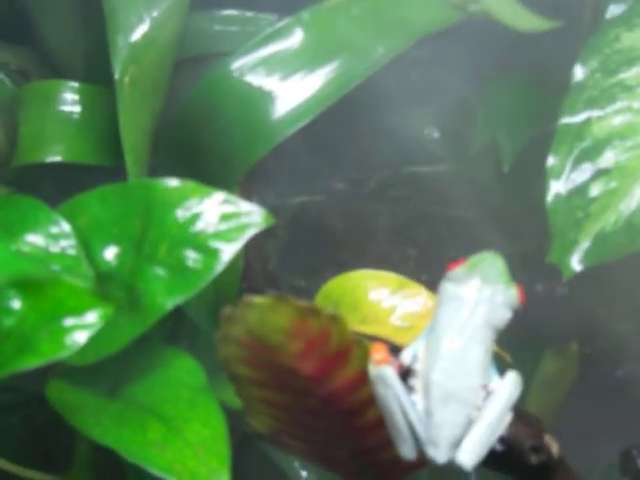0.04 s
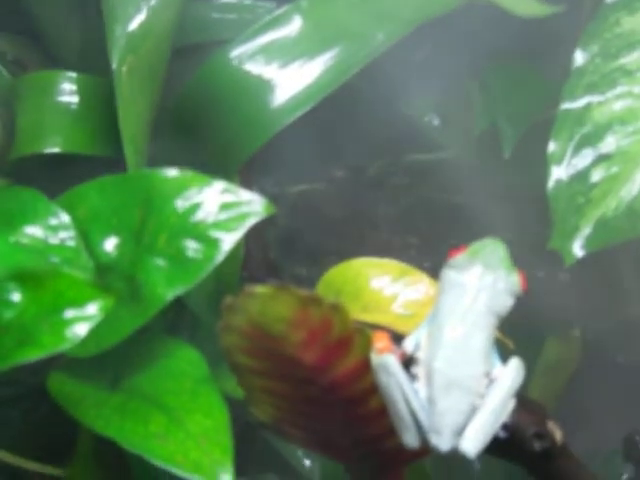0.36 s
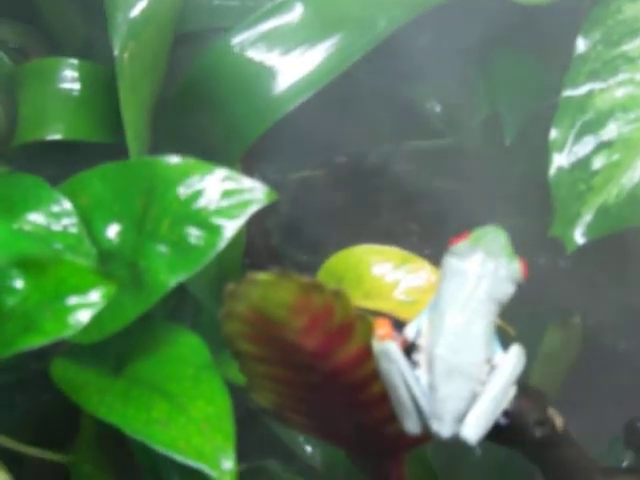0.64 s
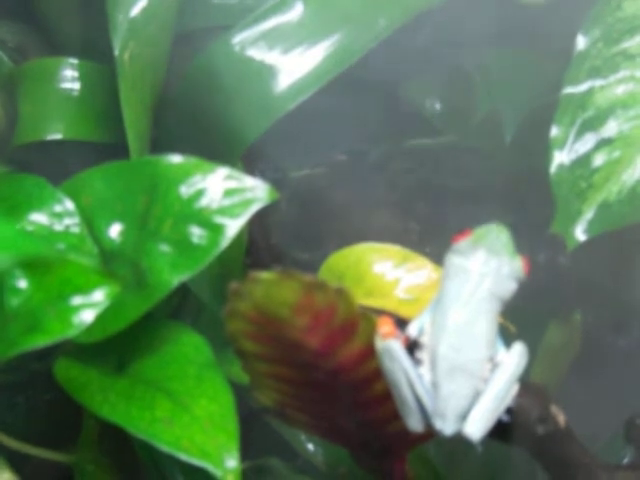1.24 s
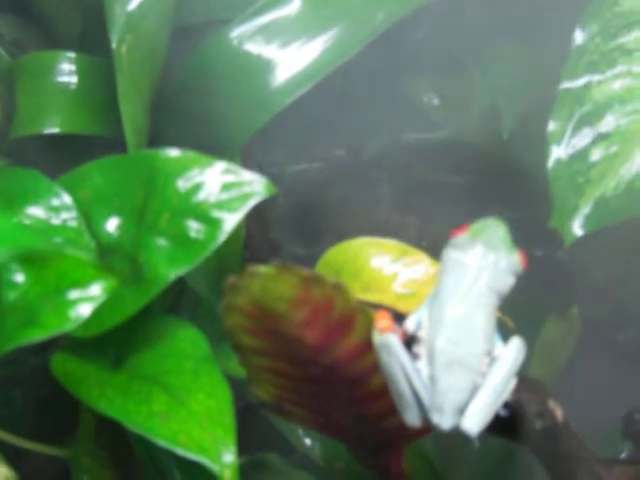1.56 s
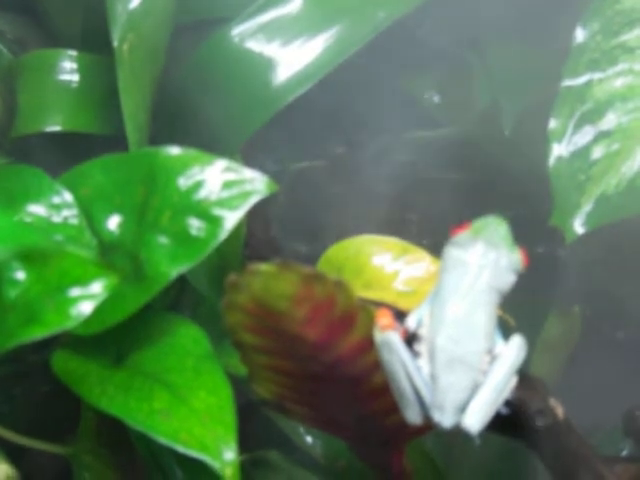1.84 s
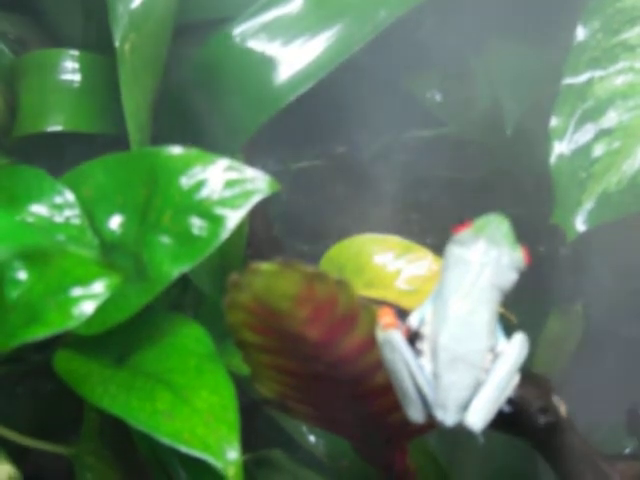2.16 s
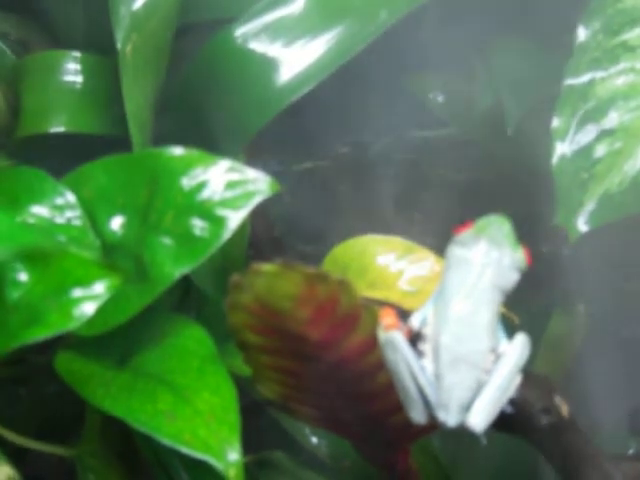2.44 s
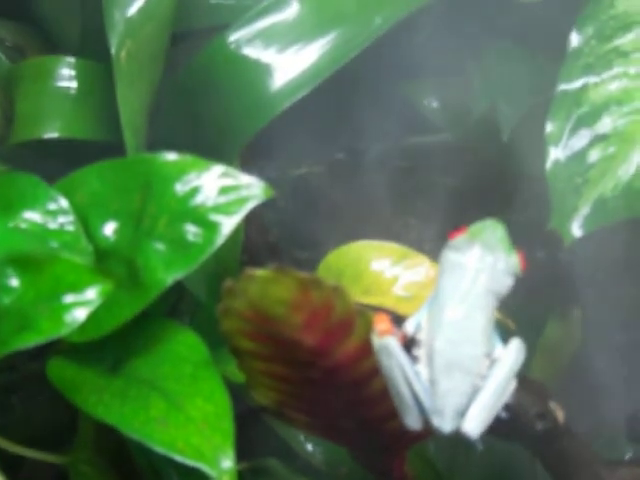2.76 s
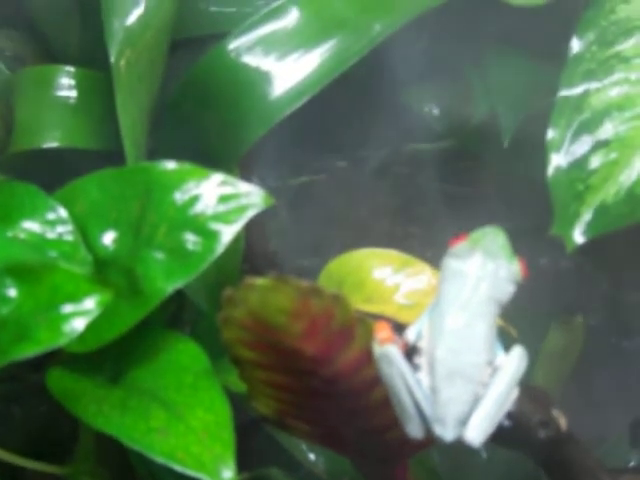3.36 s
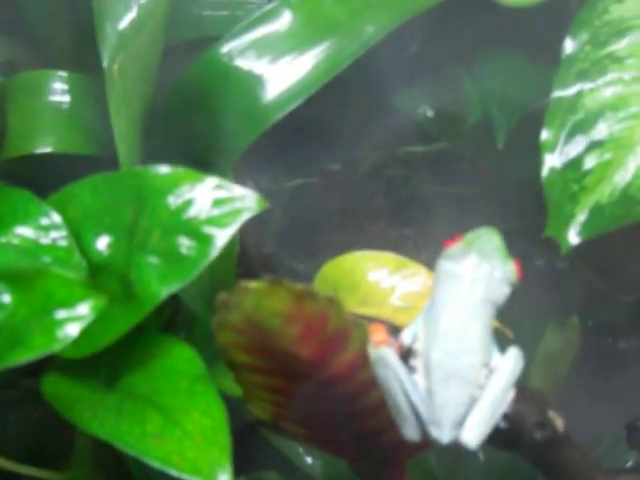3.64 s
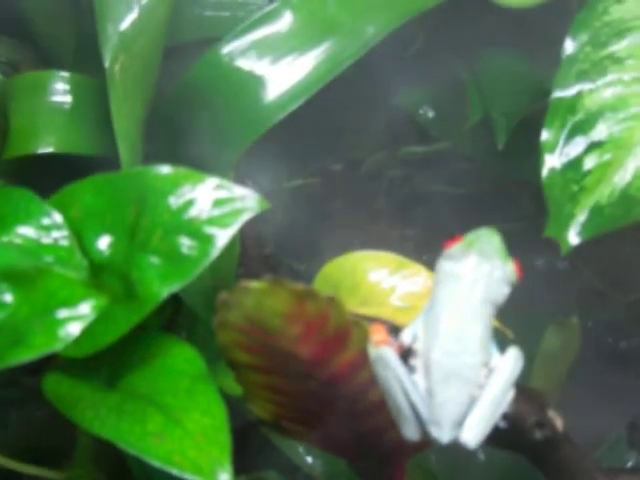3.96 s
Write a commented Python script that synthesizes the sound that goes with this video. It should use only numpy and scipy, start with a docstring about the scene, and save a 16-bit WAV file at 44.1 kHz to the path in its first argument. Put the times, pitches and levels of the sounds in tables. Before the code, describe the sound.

A fine water spray hisses and patters for the whole four seconds, close up in a glass terrarium, over a steady low pump hum and soft airflow. Drops tick on leaves and plop faintly throughout. Soft, deep microphone bumps come near 0.4, 1 and 1.5 seconds. Heavier droplets spatter briefly around 1.9 and 2.7 seconds, and again from 3.3 to 3.8 seconds.

```python
"""A mains pump hums over a soft rush of air, while mist hisses and droplets patter in a glass terrarium.
Each impact excites a damped resonance: drops plop on a hollow surface, tick on leaves or burst in
bright splats, and the glass walls add early reflections and a brief reverberation. A few soft bumps
shake the microphone, and later come flurries of heavier droplets."""
import sys
import numpy as np
from scipy.fft import rfft, irfft, next_fast_len
from scipy.io import wavfile
from scipy.ndimage import uniform_filter1d, map_coordinates

SR = 44100
rng = np.random.default_rng(int(sys.argv[2]) if len(sys.argv) > 2 else 0)


def generate_wav(signal):
    """Clip the signal to [-1, 1] and save it as 16-bit WAV at the path in sys.argv[1]."""
    frames = np.transpose(np.atleast_2d(signal))
    scaled = np.clip(frames, -1, 1) * 32767
    pcm = np.round(scaled).astype(np.int16)
    wavfile.write(sys.argv[1], SR, pcm)


N = 176400
BAND_LIMIT_HZ = 15900
# response of the hollow body (frequency [Hz], gain [dB])
HOLLOW_BODY = [(400, -12), (800, -1.5), (1000, 4.5), (1330, 4), (1550, -16), (3000, -14), (8000, -32)]


def amp(db):
    """Amplitude ratio of a level in decibels."""
    return 10 ** (np.asarray(db) / 20)


def unit(x):
    """Normalisation to rms 1."""
    return x / np.sqrt(np.mean(x ** 2) + 1e-20)


def wobble(rate):
    """Slow random modulation: a spline through `rate` Gaussian knots a second."""
    knots = rng.standard_normal(int(N * rate / SR) + 4)
    return map_coordinates(knots, [np.arange(N) * rate / SR])


def filtered(x, response):
    """Linear filtering: the spectrum is multiplied by a frequency response."""
    size = next_fast_len(2 * len(x))
    return irfft(rfft(x, size) * response(np.fft.rfftfreq(size, 1 / SR)), size)[:len(x)]


def coloured(x, points):
    """Spectral shaping by (frequency [Hz], gain [dB]) points, joined on a log frequency axis."""
    hz, db = np.transpose(points)
    return filtered(x, lambda f: amp(np.interp(np.log(f + 1), np.log(hz + 1), db)))


def resonance(f, centre, width):
    """Band-pass response of a damped oscillator with Q = centre / width."""
    return 1j * f * width / (centre ** 2 - f ** 2 + 1j * f * width)


def add(track, start, sound):
    """Superposition: a sound joins the track at `start` seconds."""
    part = track[max(0, round(start * SR)):][:len(sound)]
    part += sound[:len(part)]


def pump(mains_hz=59.98):
    """Periodic mains drive gives a harmonic series; the upper partials waver more."""
    # partials of the hum (harmonic number, rms level [dB])
    harmonics = [(1, -56), (2, -47), (3, -35.5), (4, -57), (5, -50), (6, -59), (8, -54.5), (9, -52.5),
                 (11, -62), (12, -61)]
    t, hum = np.arange(N) / SR, np.zeros(N)
    for k, db in harmonics:
        waver_db = (0.52 if k <= 3 else 1.28) * wobble(5)
        hum += amp(db + waver_db) * np.sqrt(2) * np.sin(2 * np.pi * (k * mains_hz * t + rng.random()))
    return hum


def air():
    """Rushing air makes low broadband noise, part of it ringing in the modes of the housing."""
    # spectrum of the airflow (frequency [Hz], relative level [dB])
    spectrum = [(12, -56), (20, -7), (65, -9.5), (90, -10), (102, -8.5), (123, -15), (145, -10.5),
                (162, -9), (181, -5.5), (194, -13.5), (209, -15.5), (302, -14), (325, -20), (349, -14.5),
                (443, -13.5), (533, -11.5), (874, -18), (1150, -17), (1600, -26.5), (2080, -55),
                (3520, -120)]
    # modes of the housing (frequency [Hz], bandwidth [Hz], gain [dB])
    modes = [(163.2, 11.5, 1.5), (355.3, 46, -4), (408.6, 15, -3), (583, 48, -8), (645, 20.6, -6.5)]
    housing = lambda f: sum(amp(db) * resonance(f, hz, width) ** 2 for hz, width, db in modes)
    rush = unit(coloured(rng.standard_normal(N), spectrum))
    ring = unit(filtered(rng.standard_normal(N), housing))
    return amp(-45) * rush + amp(-47.5) * ring


def spray_db():
    """The spray's level envelope, which modulates mist, patter and splats."""
    # strength of the spray (time [s], level [dB])
    strength = [(0, -42), (.12, -47), (.23, -45.5), (.36, -49.5), (.5, -43), (.67, -50.5), (.78, -39.5),
                (.98, -49), (1.23, -43), (1.33, -44), (1.46, -42.5), (1.67, -51), (1.84, -46),
                (1.94, -39.5), (2.02, -42.5), (2.07, -49), (2.21, -43.5), (2.3, -50.5), (2.5, -44.5),
                (2.77, -42), (2.9, -46.5), (3.0, -45.5), (3.08, -44), (3.21, -45), (3.47, -38),
                (3.57, -45.5), (3.7, -43), (3.88, -46.5), (4, -43)]
    return np.interp(np.arange(N) / SR, *np.transpose(strength))


def mist():
    """Amplitude-modulated noise: an unsteady hiss that swells a little with the spray."""
    # spectrum of the hiss (frequency [Hz], relative level [dB])
    spectrum = [(800, -26), (1600, 2), (2200, 0.5), (2850, 4.5), (3400, -0.5), (4500, -0.5), (7000, -9),
                (11000, -6.5), (14000, -7), (16000, -10.5)]
    swell_db = 0.15 * (spray_db() - spray_db().mean()) + 2.2 * wobble(12)
    return amp(-54 + swell_db) * unit(coloured(rng.standard_normal(N), spectrum))


def drop(hz, q, splash_db, t60, echo_db, size=4096):
    """Impact excitation: a damped ring and a brighter splash, reverberating between the panes."""
    build_up_s, contact_s, splash_top_hz, crest_factor = 0.00052, 0.00065, 9500, 2.43
    t = np.arange(size) / SR
    echo = rng.standard_normal(size) * amp(-60 * t / t60) * (1 - np.exp(-t / build_up_s))
    echo *= amp(echo_db) / np.linalg.norm(echo)
    contact = rng.standard_normal(size) * t * np.exp(-t / contact_s)
    contact /= np.linalg.norm(contact)
    impulse = t == 0
    ring = filtered(impulse + echo, lambda f: resonance(f, hz, hz / q) * resonance(f, hz, hz))
    splash_band = lambda f: resonance(f, hz, hz / 2) * 1j * f / hz / (1 + 1j * f / splash_top_hz)
    splash = filtered(contact + echo, lambda f: splash_band(f) * (f < BAND_LIMIT_HZ))
    sound = unit(ring) + amp(splash_db) * unit(splash)
    loudest_rms = np.sqrt(uniform_filter1d(sound ** 2, size=128).max())
    return sound / (crest_factor * loudest_rms)  # peaks near 1


def shower(start, length, per_s, low_hz, high_hz):
    """Shot noise: impacts of random time, strength and pitch, with rms near 1 while they fall."""
    track, count = np.zeros(N), int(per_s * length)
    for i, (jitter, pitch, weight) in enumerate(rng.random((count, 3))):
        db = 3.5 * min(-np.log(1 - weight), 3)  # capped exponential spread: most drops are weak
        hz = low_hz * (high_hz / low_hz) ** (pitch ** .75)
        droplet = drop(hz, q=17, splash_db=-6.5, t60=0.034, echo_db=3, size=1024)
        add(track, start + (i + 2 * jitter) / per_s, amp(db) * droplet)
    return unit(track) * np.sqrt(length * SR / N)


def patter():
    """Dense impacts of fine droplets merge into a crackle whose level follows the spray."""
    # colour of the fine droplets (frequency [Hz], gain [dB])
    colour = [(900, -30), (1800, -11), (2900, -0.5), (3700, -1), (5000, -2), (6600, 2.5), (8500, -1),
              (11000, 1), (13000, -8.5), (15500, -22)]
    droplets = shower(0, N / SR, per_s=300, low_hz=2540, high_hz=13400)
    return amp(spray_db() - 4) * unit(coloured(droplets, colour))


def splats(per_s=50, low_hz=5100, high_hz=12640, range_db=14, t60=.042, size=2048):
    """Short bursts have wide spectra: middling droplets give a high ping, a splash and a faint click."""
    # colour of the bursts (frequency [Hz], gain [dB])
    colour = [(900, -10), (2000, -6), (3000, 4), (5000, 0), (7000, -1), (9500, -2.5), (11500, 2),
              (13500, 2.5), (15500, -5)]
    track, t = np.zeros(N), np.arange(size) / SR
    count = int(per_s * N / SR)
    for i, (jitter, level, pitch) in enumerate(rng.random((count, 3))):
        hz = low_hz + pitch * (high_hz - low_hz)
        click = rng.standard_normal(size) * amp(-14.5 - 60 * t / t60)
        ping = drop(hz, q=20, splash_db=-2.5, t60=t60, echo_db=1.5, size=size)
        add(track, (i + 2 * jitter) / per_s, amp(range_db * level) * (ping + click))
    return amp(spray_db() - 4.5) * unit(coloured(track, colour))


def gurgle():
    """Repeated excitation by small drops keeps the hollow body resonating faintly."""
    droplets = shower(0, N / SR, per_s=45, low_hz=948, high_hz=1350)
    return amp(-56.5) * unit(coloured(droplets, HOLLOW_BODY))


def plops():
    """Bigger drops excite low, well-damped resonances, filtered by the hollow body."""
    # drops on the hollow surface (time [s], relative level [dB], pitch [Hz])
    impacts = [(0.041, -30, 1020), (0.134, -26, 1080), (0.206, -29.5, 1120), (0.426, -32, 1170),
               (0.443, -25, 1210), (0.506, -30, 1150), (0.534, -30.5, 1270), (0.753, -32, 1350),
               (0.875, -27.5, 980), (1.326, -30.5, 1250), (1.344, -30, 1244), (1.378, -26.5, 1110),
               (1.414, -25.5, 960), (2.137, -34, 1040), (2.226, -29, 1040), (2.267, -32, 1170),
               (2.419, -34.5, 1130), (2.607, -32.5, 1250), (3.031, -25.5, 1170), (3.061, -27, 1030),
               (3.107, -32, 1020), (3.318, -27.5, 1130), (3.615, -31.5, 1340), (3.706, -28.5, 1236),
               (3.801, -30.5, 1250), (3.955, -24, 1030)]
    track = np.zeros(N)
    for start, db, hz in impacts:
        add(track, start, amp(db + 1) * drop(hz, q=8, splash_db=-19, t60=0.11, echo_db=0))
    return coloured(track, HOLLOW_BODY)


def ticks():
    """Bigger drops strike the leaves; each impulse excites a brief, high resonance."""
    # drops on leaves (time [s], relative level [dB], pitch [Hz], splash-to-ring ratio [dB])
    impacts = [(0.084, -31, 8360, -14), (.152, -31, 6730, -8), (.187, -25.5, 9400, 6), (.203, -29, 9200, 3),
               (.214, -28, 6700, -14), (.229, -24.5, 7060, 0), (.258, -26, 10700, -8),
               (.312, -27.5, 6700, -17), (0.3301, -26, 3740, -7), (0.461, -30.5, 10600, -3),
               (0.4985, -26, 3270, 1), (0.523, -26.5, 3840, 1), (.533, -25, 5400, -10),
               (.748, -24, 10900, -3), (0.826, -26.5, 7950, -5), (.918, -29, 12000, -7),
               (1.0156, -24, 6570, -5), (1.0696, -24, 8600, 1), (1.1368, -19, 11050, -13),
               (1.2003, -24.5, 5720, -10), (1.235, -24.5, 7000, -11), (1.4215, -23, 4530, 7),
               (1.436, -27.5, 8100, -12), (1.53, -31.5, 4100, -18), (1.568, -25.5, 11300, -6),
               (1.570, -29, 5500, -15), (1.596, -20.5, 12800, -13), (1.603, -23, 7030, -7),
               (1.624, -26, 14000, -5), (1.696, -30, 3000, 2), (1.7343, -24, 10040, -12),
               (1.753, -25, 3740, -8), (1.7773, -24, 11800, 3), (1.889, -24, 6700, -12),
               (1.899, -26, 9000, 0), (1.942, -30, 7660, -16), (1.978, -32, 8450, 2),
               (2.017, -24, 10400, -8), (2.122, -30, 9300, -9), (2.3274, -26, 6490, 17),
               (2.4194, -23, 3300, -5), (2.454, -27.5, 8450, 9), (2.485, -25, 8600, -3),
               (2.5034, -18.5, 3500, -2.5), (2.557, -29.5, 11100, -8), (2.569, -21.5, 3930, -13),
               (2.607, -17.5, 7130, -12), (2.641, -28, 6700, -7), (2.682, -31, 12000, -6),
               (2.694, -31.5, 2450, 11), (2.725, -25.5, 8500, -5), (2.779, -25.5, 8350, -6),
               (2.8114, -20, 6500, -24), (2.8415, -24.5, 4240, -3), (2.881, -22, 4370, -1),
               (2.9307, -28, 3550, -18), (2.9438, -23.5, 2120, -6), (3.0612, -19.5, 9500, 22),
               (3.1612, -26.5, 5070, 0), (3.318, -34.5, 1700, -10), (3.5089, -20, 5740, -20),
               (3.5322, -21.5, 3980, -14), (3.603, -21, 12400, -2), (3.668, -27.5, 6700, 3),
               (3.791, -20.5, 8600, 2), (3.934, -17.5, 2370, -5), (3.961, -27.5, 7650, 13)]
    track = np.zeros(N)
    for start, db, hz, splash_db in impacts:
        add(track, start, amp(db - .5) * drop(hz, q=19, splash_db=splash_db, t60=0.056, echo_db=1.5))
    return track


def bumps(attack_s=0.012, t60=0.59):
    """Soft knocks shake the microphone in deep, damped oscillations of uneven phase."""
    # knocks (time [s], peak level [dB], frequency [Hz])
    knocks = [(.42, -33, 29.6), (0.998, -30, 46.3), (1.03, -48, 30.8), (1.51, -35, 47), (2.72, -48, 32)]
    track, t = np.zeros(N), np.arange(N) / SR
    envelope = (1 - np.exp(-t / attack_s)) * amp(-60 * t / t60)
    envelope /= envelope.max()
    for start, db, hz in knocks:
        phase = 2 * np.pi * hz * t + .5 * wobble(25)
        add(track, start, amp(db) * envelope * np.sin(phase))
    return track


def flurries():
    """Bursts of shot noise: heavier droplets spatter the leaves, ringing lower than the fine ones."""
    # flurries of droplets (time [s], duration [s], rms level [dB])
    bursts = [(1.852, 0.13, -47.5), (2.619, 0.29, -52.5), (3.3, .25, -53), (3.6, 0.22, -53)]
    return sum(amp(db) * shower(start, length, per_s=200, low_hz=1970, high_hz=4900)
               for start, length, db in bursts)


def walls(direct, count=6, spread_s=.006):
    """Early reflection: the near panes return weak delayed copies, here of alternating sign."""
    delays = spread_s * (np.arange(count) + rng.random(count)) / count
    copies = sum(np.pad(direct, (round(delay * SR) + 1, 0))[:N] * (-1) ** k
                 for k, delay in enumerate(delays))
    return direct + amp(-19.5) * copies


def scene():
    """The sources superpose at one close microphone, the drops with their early reflections."""
    background = pump() + air() + mist() + bumps()
    water = ticks() + plops() + splats() + patter() + flurries() + gurgle()
    return (background + walls(water))[None]


def record(dry):
    """Band limiting: an ideal low-pass filter removes the highest treble."""
    return np.array([filtered(channel, lambda f: f < BAND_LIMIT_HZ) for channel in dry])


dry = scene()
out = record(dry)
generate_wav(out)
```